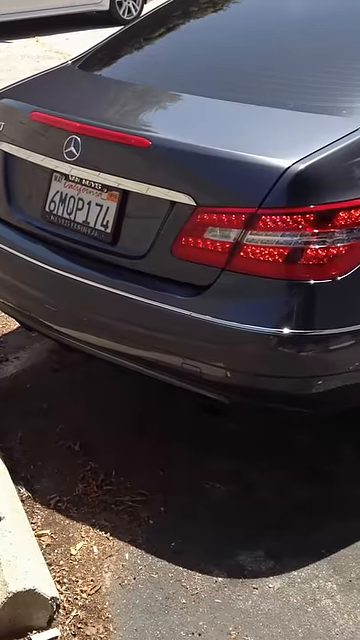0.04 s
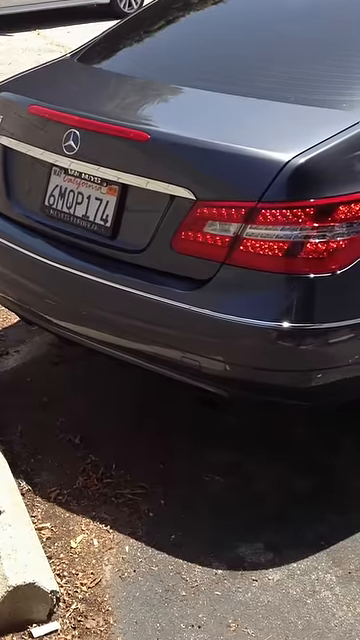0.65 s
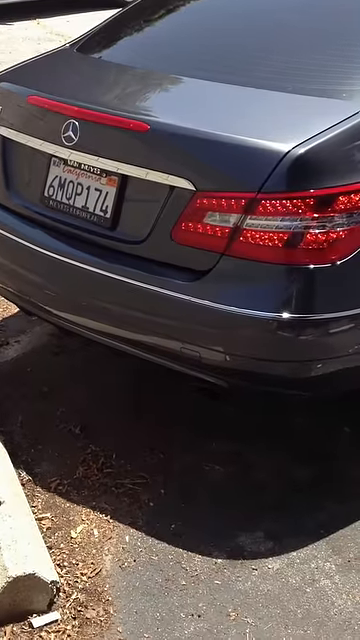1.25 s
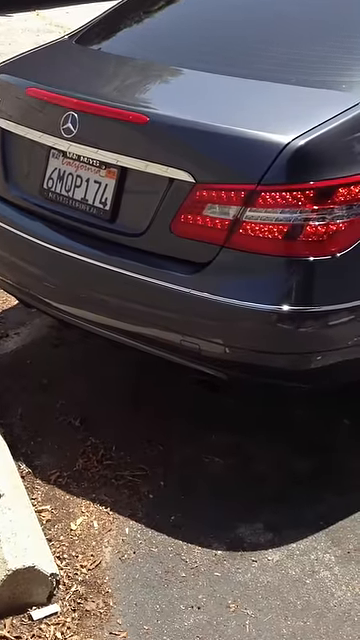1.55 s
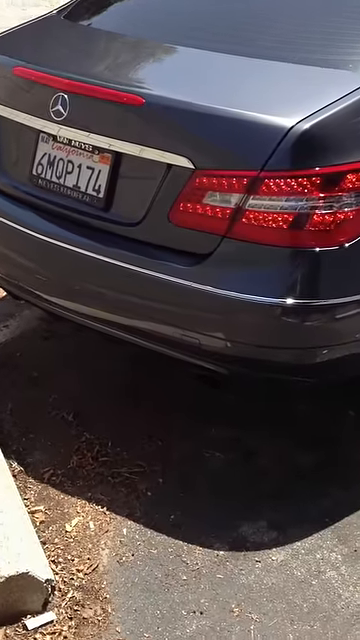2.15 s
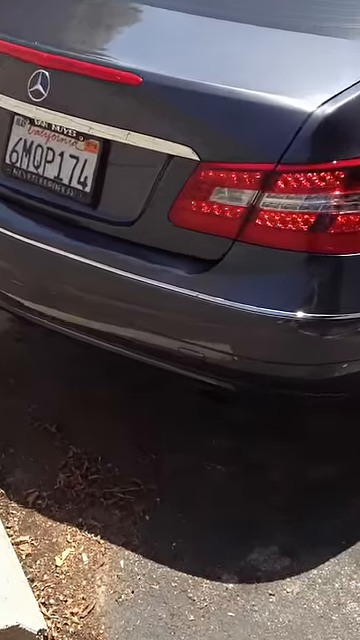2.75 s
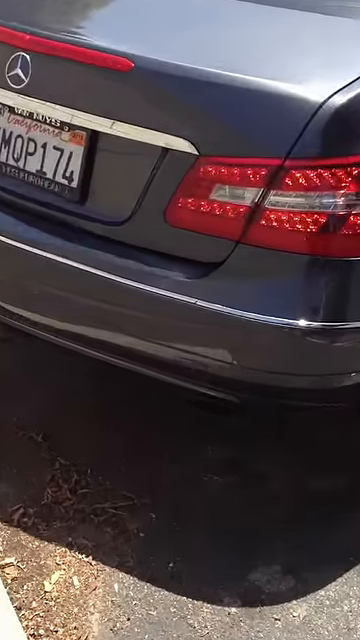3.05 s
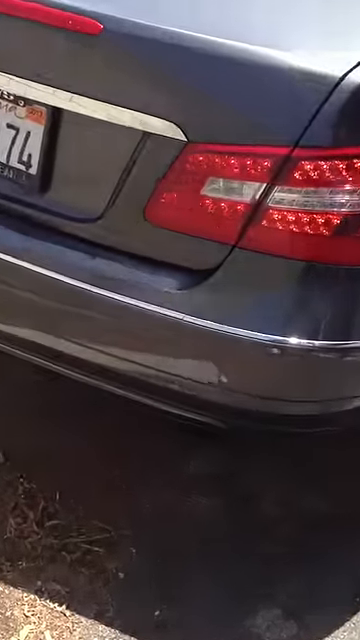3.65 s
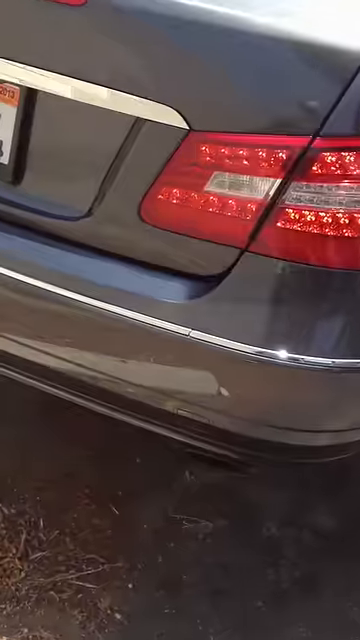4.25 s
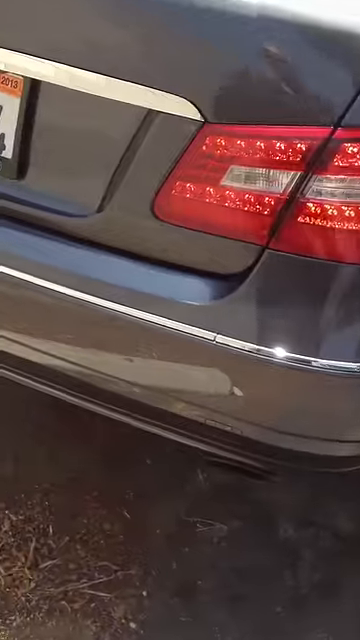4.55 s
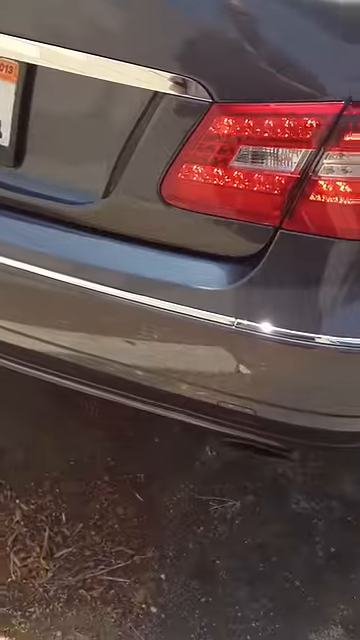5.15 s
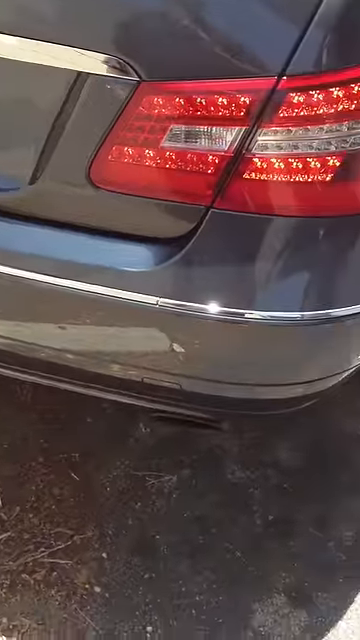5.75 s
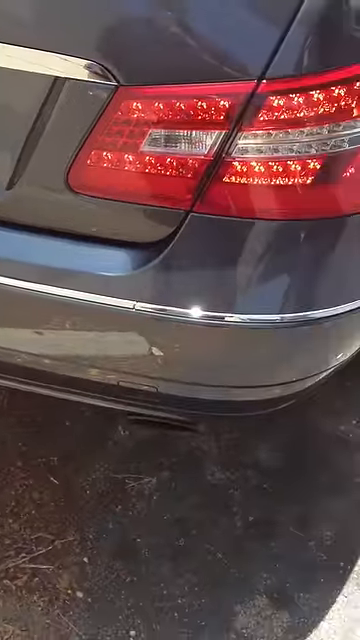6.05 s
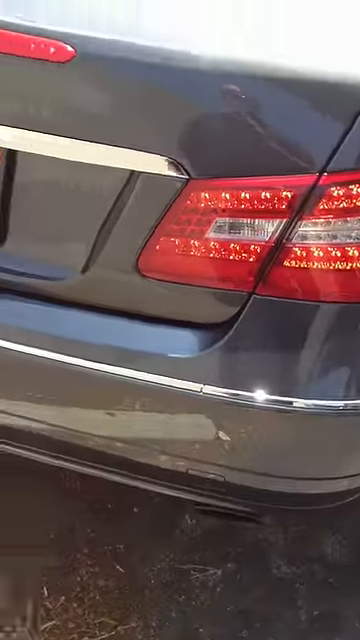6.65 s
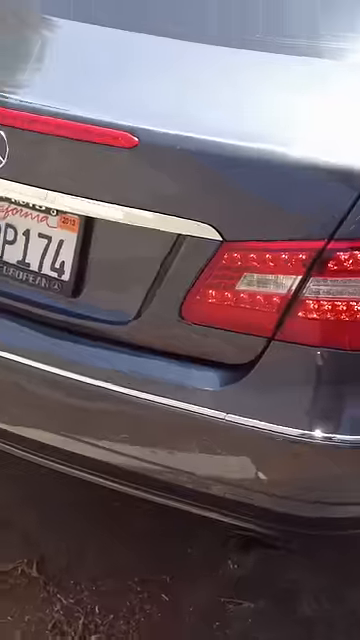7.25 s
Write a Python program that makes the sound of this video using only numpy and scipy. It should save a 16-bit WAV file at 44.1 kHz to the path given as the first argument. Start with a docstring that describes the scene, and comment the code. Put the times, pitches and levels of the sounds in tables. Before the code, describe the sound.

Close behind a parked car in quiet open air, a loud exhaust swells from a deep idle to a growling peak, spits a few quick cracks and sinks again. The microphone moves nearer the pipe as a second, higher rev builds and crackles. The engine note hangs for a moment, puffing and burbling over a breathy hiss, then drops back to a low rumble.

```python
"""Two revs through a sport exhaust

A parked six-cylinder car is revved twice, heard from just behind the tailpipe. The firing orders boom
as they sweep through the pipe's resonance. Under throttle the pipe barks, rasps and growls, at the top
of each rev it crackles, and on the way down it burbles and puffs over the hiss of the gas."""
import sys
import numpy as np
from scipy import signal
from scipy.fft import rfft, irfft, next_fast_len
from scipy.io import wavfile
from scipy.ndimage import uniform_filter1d, minimum_filter1d, map_coordinates

SR = 44100
rng = np.random.default_rng(int(sys.argv[2]) if len(sys.argv) > 2 else 0)


def dump_mix(stems):
    """Bounce the given channels to the path in sys.argv[1] as a 16-bit WAV at rate SR."""
    frames = np.atleast_2d(stems).T  # one column per channel
    limited = np.clip(frames, -1, 1)  # hard clip at full scale
    pcm = np.round(limited * 32767).astype(np.int16)
    wavfile.write(sys.argv[1], SR, pcm)


N = 331191
TIME = np.arange(N) / SR

# the six cylinders in firing order: pulse_size, lateness_periods
CYLINDERS = [(1.18, 0), (.85, .1), (1.12, 0), (.8, .11), (1.15, .012), (.88, .095)]
# harmonics of the firing rate: multiple, level_db, full_effort_db, speed_db_per_octave
ORDERS = [(1, 0.25, 11, -1), (2, -10, 21.5, -1), (3, -18, 29, -1.5), (4, -21, 29, -1.5)]
# the listener leans in as the second rev dies, lifting bark, rasp and hiss: time_s, gain_db
LEAN_IN = [(4.2, -.5), (5.1, -1.5), (5.8, 2.5), (6.3, 0.5), (7.0, -2)]


def boom(turns, speed, effort, near, waver_db=.6, roughness=.05):
    """The low firing orders carry the engine's note; the higher ones waver more."""
    tones = np.zeros(N)
    for k, order in enumerate(ORDERS, 1):
        gain = amp(order_db(order, speed, effort, near) + waver_db * k * wobble(14))
        tremble = 1 + roughness * k * wobble(45)
        tones += gain * tremble * firing_order(turns, k)
    return amp(lull_db()) * tones


def firing_order(turns, k):
    """A tone at k times the firing rate, its phase offset so the summed boom swings evenly."""
    return np.cos(2 * np.pi * k * turns - np.pi * k * (k - 1) / 4)


def order_db(order, speed, effort, near, build_up_s=.008):
    """An order fills out at the first touch of the pedal and swells through each pipe resonance."""
    k, base_db, effort_db, octave_db = order
    hz = round(k) * np.interp(TIME - build_up_s, TIME, speed)
    return pipe_db(hz, near) + layer_db((base_db, effort_db, 0, octave_db), speed, np.sqrt(effort), near)


def pipe_db(hz, near):
    """The pipe's low resonances, as heard from where the listener stands."""
    # pipe response: frequency_hz, aside_db, at_mouth_db
    response = [(44.7, -63, -61.9), (88.4, -39, -34.5), (107.6, -21.5, -16), (118.5, -18.5, -12.5),
                (138.4, -8.5, -6.5), (156.6, -11.5, -14.0), (185, -17.5, -28.5), (216, -20.5, -24.5),
                (238, -22, -11.5), (267, -37.5, -15.5), (307, -38.5, -20), (335, -28, -13.5),
                (400, -38.5, -38.5), (472, -33, -16), (550.0, -31.5, -25.5), (709, -29, -7),
                (794, -26, -38), (1000.0, -53, -16.5)]
    f, aside, mouth = np.transpose(response)
    return (1 - near) * along(np.c_[f, aside], hz) + near * along(np.c_[f, mouth], hz)


def lull_db(onset_s=.03):
    """The coasting engine's note briefly drops away, or once lifts, then recovers."""
    # lulls in the note: start_s, gain_db, recovery_s
    lulls = [(1.4, -5, 0.022), (2.79, -21.5, 0.27), (4.645, -3, 0.034), (5.42, -12, 0.02), (5.73, 3, 0.098),
             (6.93, -25, 0.26)]
    return sum(db * ramp_and_fall(s, onset_s, s + onset_s, recovery) for s, db, recovery in lulls)


def lope(turns, speed, effort, near, level_db=-13.5, waver_db=2):
    """Uneven cylinders burble between the orders, more at speed, under load and in the resonances."""
    # tones of the engine cycle: multiple, level_db
    cycle_tones = [(3, -11), (4, -3.5), (5, -2.5), (7, 0), (8, 0), (9, -8), (10, -3), (11, -1), (13, 0),
                   (14, -27), (15, -10), (16, -3), (17, -2)]
    upper_db = -4 + 6 * effort + 2 * near
    tones = np.zeros(N)
    for k, db in cycle_tones:
        ratio = round(k) / len(CYLINDERS)
        gain = amp(db + pipe_db(speed * ratio, near) + waver_db * wobble(10) + upper_db * (ratio > 1))
        tones += gain * np.sin(2 * np.pi * (ratio * turns + rng.random()))
    return amp(level_db) * np.minimum(speed / 160, 1) ** 1.04 * tones


def tailpipe(turns, speed, effort, near, flutter_db=1.5):
    """Firing pulses and gushes of gas excite the pipe's upper resonances: bark, rasp and growl."""
    # how each follows the engine: coasting_db, full_effort_db, near_db, speed_db_per_octave
    bark_law = (-41.5, 28.5, 5, 7.5)
    rasp_law = (-39.5, 15.5, 3.5, 7)
    growl_law = (-53, 34.5, 12, 1.5)
    bark_db, rasp_db, growl_db = (layer_db(law, speed, effort, near)
                                  for law in (bark_law, rasp_law, growl_law))
    # hard throttle brings out the pulses; a coasting engine fires unevenly and blows more noise
    drive = np.clip((bark_db + 36) / 18, .2, 1)
    pulses, gush = firings(turns)
    pulses *= amp(5.5 * (1 - drive) * wobble(140))
    tone, breath = pipe_echo(pulses), pipe_echo(gush * noise())
    body = amp(bark_db) * bark(tone, breath, drive, near)
    edge = amp(rasp_db) * rasp(tone, breath, drive, near)
    flutter = amp(flutter_db * effort * wobble(65))  # ragged under load
    return amp(curves(LEAN_IN)[0]) * flutter * (body + edge) + amp(growl_db) * growl(tone, breath)


def firings(turns, scatter_db=1.2, jitter_periods=.005):
    """One impulse per firing, and the envelope of the gush of gas that follows each."""
    samples = np.arange(N)
    number = np.arange(1, int(turns[-1]))
    size, late = np.array(CYLINDERS)[number % len(CYLINDERS)].T
    timing, strength = rng.standard_normal((len(number), 2)).T
    at = np.interp(number + late + jitter_periods * timing, turns, samples)
    pulses = np.bincount(np.round(at).astype(int), size * amp(scatter_db * strength), N)[:N]
    latest = np.clip(np.searchsorted(at, samples) - 1, 0, None)
    age_periods = np.abs(turns - np.interp(at, samples, turns)[latest])
    return pulses, unit(.52 + np.exp(-age_periods / .79))


def pipe_echo(x, round_trip_s=.0045, reflection=.091, smear_s=.008, width_hz=12):
    """The open end reflects, standing waves ring, and the muffler's chambers smear each pulse."""
    # narrow standing waves: pitch_hz, level_db
    modes = [(460, -3), (669, -6), (892, -2), (1003, -4), (1145, -4), (1263, -2), (1489, -1), (1888, -5),
             (2175, -2), (2347, -1), (2555, 0), (3128, 0)]

    def response(f):
        echo = 1 / (1 - reflection * np.exp(-2j * np.pi * f * round_trip_s))
        delay_s = smear_s * f / (f + 1500)
        smear = np.exp(-2j * np.pi * np.cumsum(delay_s) * f[1])
        damping = 1j * f * width_hz
        ring = 1 + sum(amp(db) * damping / (hz ** 2 - f ** 2 + damping) for hz, db in modes)
        return echo * smear * ring
    return filtered(x, response)


def pipe_voice(tone, breath, colour, drive, breathiness):
    """Pulses and breath through one colour of the pipe, held at an even level."""
    pitched = drive * steady(coloured(tone, colour))
    return steady(pitched + breathiness * unit(coloured(breath, colour)))


def bark(tone, breath, drive, near):
    """The pipe's midrange shout changes colour as the listener comes round to its mouth."""
    # colours at the mouth and off axis: frequency_hz, gain_db
    mouth_colour = [(150, -55), (300, -9), (430, -4), (540, -4), (670, 9.5), (820, 3), (1020, -1.5),
                    (1200, 3.5), (1330, -3), (1480, 3), (1700, -8), (2600, -15), (5000, -50)]
    aside_colour = [(150, -46), (320, -19), (450, 2), (540, -3), (660, 6.5), (800, 10), (1000, 7.5),
                    (1180, 5), (1350, -9.5), (1500, -8), (1750, -17), (2600, -31), (5000, -77)]
    mouth = pipe_voice(tone, breath, mouth_colour, drive, breathiness=.45)
    aside = pipe_voice(tone, breath, aside_colour, drive, breathiness=.55)
    return np.sqrt(near) * mouth + np.sqrt(1 - near) * aside


def rasp(tone, breath, drive, near, beam_db=2):
    """A bright edge beamed from the pipe's mouth; it turns to breath as the engine coasts."""
    # colours with the throttle open and shut: frequency_hz, gain_db
    open_colour = [(900, -34), (1550, -2), (1890, 4), (2200, -1), (2400, -2), (2800, -1.5), (3300, 0),
                   (4200, -9), (5500, -14), (9000, -28), (15000, -48)]
    shut_colour = [(900, -13), (1500, 5), (2000, 5), (2700, -3), (3400, -6.5), (4400, -4.5), (7000, -13.5),
                   (15000, -20)]
    driven = drive * pipe_voice(tone, breath, open_colour, drive, breathiness=.8)
    coasting = amp(-2) * np.sqrt(1 - drive ** 2) * unit(coloured(breath, shut_colour))
    return (driven + coasting) * amp(beam_db * (near - .5))


def growl(tone, breath):
    """Pulses and a little breath ring in the pipe's throaty low mids."""
    # throat colour: frequency_hz, gain_db
    throat = [(180, -48.5), (270, -17.5), (350, 3.5), (450, 1.5), (550, -15.5), (660, -3), (780, 5.5),
              (920, -20.5), (1400, -48.5)]
    return steady(coloured(tone, throat)) + .22 * unit(coloured(breath, throat))


def crackle(rise_s=.00017, fall_s=.0096, split_hz=5500):
    """Each crack is a sudden burst of turbulence; the hardest reach far into the treble."""
    # cracks at the top of a rev, one an engine cycle: start_s, level_db, treble_db
    cracks = [(1.2229, -5.5, -28), (1.246, -4.5, -25), (1.269, -3, -14), (1.2964, -9, -26),
              (4.532, -3, -25), (4.554, -3, -18.5), (4.576, -4, -12), (4.5976, -0.5, -15),
              (4.6223, -2, -16), (4.6458, -10, -20), (4.663, -11, -24)]
    # their colour: frequency_hz, gain_db
    colour = [(60, -52), (530, -35), (900, -10), (1100, -7), (1360, -30), (1510, -7), (1760, -14),
              (1910, -4), (3030, -13), (4570, -18), (6060, -20.5), (7150, -14), (9820, -29.5), (15000, -36)]
    body, edge = np.zeros(N), np.zeros(N)
    for s, db, treble_db in cracks:
        age = np.clip(TIME - s, 0, 1)
        burst = amp(db) * (1 - np.exp(-age / rise_s)) * np.exp(-age / fall_s)
        body += burst
        edge += burst * amp(treble_db)
    low = unit(filtered(coloured(noise(), colour), lambda f: f < split_hz))
    high = unit(filtered(coloured(noise(), colour), lambda f: f > split_hz))
    return amp(-7) * body * low + edge * high


def overrun(turns):
    """As the throttle shuts, afterburn puffs thump in the pipe and single orders honk."""
    # soft puffs: start_s, level_db, pitch_hz, rise_s
    puffs = [(4.69, -39, 137, 0.011), (4.91, -28, 140.1, .01), (5.155, -19.5, 134, 0.0146),
             (5.42, -21, 132, 0.02), (5.61, -21, 140, 0.015), (7.382, -18.5, 155, 0.01)]
    # brief honks: centre_s, firing_order, level_db, width_s
    honks = [(4.915, 1, -15, .008), (5.624, 3, -13, .007), (5.624, 4, -20, .008)]
    out = np.zeros(N)
    for s, db, hz, rise in puffs:
        age = np.clip(TIME - s, 0, 1)
        envelope = (age / rise * np.exp(1 - age / rise)) ** 2
        out += amp(db) * envelope * np.sin(2 * np.pi * hz * age)
    for s, k, db, width in honks:
        out += amp(db) * swell(s, width) * firing_order(turns, round(k))
    return out


def gas_flow(turns, speed, effort, near, hiss_lag_s=.15):
    """Outflow: a throbbing hiss, a low rush, pipe rumble, and buffeting under boom and hard throttle."""
    # how each follows the engine: coasting_db, full_effort_db, near_db, speed_db_per_octave
    hiss_law = (-45, 9, 2, 6.5)
    rush_law = (-39.5, 9.5, 7.5, 4.5)
    # their colours: frequency_hz, gain_db
    hiss_colour = [(900, -29), (2500, 4), (4300, -1.5), (5500, -4), (7300, 2), (8500, -2), (10000, -7.5),
                   (12500, -8), (15500, -18)]
    rush_colour = [(25, -28), (60, -25), (100, -7), (140, -2), (250, 15), (350, 0.5), (560, 3.5), (850, -7),
                   (1400, 0), (3000, -41)]
    boom_db = order_db(ORDERS[0], speed, effort, near)
    buffet = (amp(2 * boom_db - 39) + amp(-41) * effort ** 2) * band(86, 70)
    rumble = amp(boom_db - 25) * unit(filtered(band(160, 93), lambda hz: amp(pipe_db(hz, near=1))))
    trailing_speed = np.interp(TIME - hiss_lag_s, TIME, speed)
    hiss_db = layer_db(hiss_law, trailing_speed, np.sqrt(effort), near) + curves(LEAN_IN)[0]
    throb = 1 + .068 * np.cos(2 * np.pi * turns)
    hiss = amp(hiss_db) * throb * unit(coloured(noise(), hiss_colour))
    rush = amp(layer_db(rush_law, speed, effort, near)) * unit(coloured(noise(), rush_colour))
    return hiss + rush + rumble + buffet


def whistle():
    """A thin, wavering whistle sinks after the second rev peaks."""
    # its glide: time_s, pitch_hz, level_db
    glide = [(4.75, 11600, -62), (4.85, 10900, -52), (5.0, 9700, -53), (5.1, 9000, -50), (5.25, 8500, -64)]
    hz, db = curves(glide)
    sounding = (TIME > glide[0][0]) & (TIME < glide[-1][0])
    return sounding * amp(db) * np.sin(2 * np.pi * np.cumsum(hz + 25 * wobble(150)) / SR)


def ticks_and_chirps(tick_s=.0014):
    """Two small ticks and a few faint high chirps, each a swell of band noise."""
    # ticks: start_s, level_db, pitch_hz, width_hz
    ticks = [(2.686, -32.5, 4370, 6000), (3.1, -22.5, 1390, 450)]
    # chirps: centre_s, level_db, pitch_hz, width_s, width_hz
    chirps = [(3.286, -58, 6130, 0.049, 454), (3.452, -57, 4453, 0.029, 451.5),
              (3.55, -61.5, 6160, 0.045, 453), (4.74, -53, 3150, 0.036, 90),
              (5.03, -38, 3150, 0.066, 79.96), (5.099, -43, 8900, 0.06, 89.8), (5.5, -51, 8916, 0.055, 90),
              (7.392, -56, 6250, .03, 448.8)]
    ticking = sum(amp(db) * swell(s + tick_s, tick_s) * band(hz, width) for s, db, hz, width in ticks)
    return ticking + sum(amp(db) * swell(s, span) * band(hz, width) for s, db, hz, span, width in chirps)


def idle_drone():
    """A hollow drone comes up as the engine settles."""
    # its resonances: pitch_hz, width_hz, level_db
    modes = [(268, 45, 0), (535, 65, -7), (770, 50, -10)]
    # its fade-in: time_s, level_db
    fade = [(0, -111), (6.5, -57), (6.85, -39.5), (7.2, -34), (7.51, -30)]
    return amp(curves(fade)[0]) * unit(sum(amp(db) * band(hz, width) for hz, width, db in modes))


def outdoor_air(level_db=-47):
    """A quiet, steady bed of open air."""
    # its colour: frequency_hz, gain_db
    colour = [(30, -68), (120, -18), (430, 7.5), (600, -13), (1100, 2), (2000, -13.5), (5000, -16),
              (12000, -75)]
    return amp(level_db) * unit(coloured(noise(), colour))


def layer_db(law, speed, effort, near, mid_speed_hz=150):
    """A layer's level follows effort, nearness and engine speed."""
    base_db, effort_db, near_db, octave_db = law
    return base_db + effort_db * effort + near_db * near + octave_db * np.log2(speed / mid_speed_hz)


def ramp_and_fall(start_s, rise_s, release_s, fall_s):
    """An envelope that ramps up, holds and dies away."""
    return np.clip((TIME - start_s) / rise_s, 0, 1) * np.exp(-np.maximum(TIME - release_s, 0) / fall_s)


def swell(centre_s, width_s):
    """A bell-shaped envelope."""
    return np.exp(-np.minimum(((TIME - centre_s) / width_s) ** 2, 100) / 2)


def amp(db):
    """Decibels to gain."""
    return 10 ** (np.asarray(db) / 20)


def unit(x):
    """Scale to rms 1."""
    return x / np.sqrt(np.mean(x ** 2) + 1e-20)


def steady(x):
    """Hold the running rms at 1."""
    return x / np.sqrt(np.abs(uniform_filter1d(x ** 2, size=2600)) + 1e-12)


def along(points, hz):
    """Read (frequency_hz, value) points on a log axis."""
    f, v = np.transpose(points)
    return np.interp(np.log(hz + 1), np.log(f + 1), v)


def curves(rows):
    """One value per sample for each column after the time."""
    s, *cols = np.transpose(rows)
    return [np.interp(TIME, s, c) for c in cols]


def wobble(rate):
    """A smooth random curve, rate knots a second."""
    return map_coordinates(rng.standard_normal(int(N * rate / SR) + 4), [TIME * rate])


def filtered(x, response):
    """Shape x by a function of frequency."""
    m = next_fast_len(N + 8192)
    return irfft(rfft(x, m) * response(np.fft.rfftfreq(m, 1 / SR)), m)[:N]


def coloured(x, colour, size=4096):
    """A minimum-phase filter through (frequency_hz, gain_db) points."""
    cepstrum = irfft(np.log(amp(along(colour, np.fft.rfftfreq(size, 1 / SR)))))
    cepstrum[1:size // 2] *= 2
    cepstrum[size // 2 + 1:] = 0
    return signal.oaconvolve(x, irfft(np.exp(rfft(cepstrum))))[:N]


def noise():
    """White noise of rms 1."""
    return rng.standard_normal(N)


def band(hz, width_hz):
    """Noise of rms 1 in one resonance."""
    return unit(filtered(noise(), lambda f: 1 / (1 + ((f - hz) / width_hz) ** 2) ** 2))


def scene():
    """Engine speed, throttle and the listener's nearness drive the exhaust, over a faint background."""
    # engine speed: time_s, firing_rate_hz
    revs = [(0.0, 53.0), (0.12, 51.2), (0.3, 66.5), (0.5, 97.8), (0.66, 111.9), (0.88, 174.9),
            (1.07, 178.4), (1.3, 251.0), (1.5, 215.1), (2.2, 130.5), (2.5, 94.2), (2.78, 64.5), (3.1, 46.4),
            (3.52, 41.0), (3.75, 55.1), (3.95, 82.7), (4.2, 130.0), (4.33, 170.0), (4.6, 269.7),
            (4.68, 293.4), (4.92, 254.9), (5.16, 250.0), (5.44, 213.5), (5.62, 225.2), (5.8, 198.1),
            (6.5, 114.4), (6.75, 82.7), (7.0, 60.2), (7.25, 46.8), (7.51, 41.6)]
    # presses of the accelerator: down_s, up_s, effort_0_to_1, rise_s, fall_s
    presses = [(.128, .658, 0.3, .243, .03), (.61, 0.801, 0.68, 0.047, 0.09),
               (1.061, 1.221, 0.94, .115, 0.033), (1.18, 1.294, 0.71, .05, 0.023),
               (3.542, 4.06, 0.38, 0.52, 0.033), (4.02, 4.131, 0.61, .085, 0.095),
               (4.17, 4.294, 0.56, .09, 0.055), (4.24, 4.52, 0.77, .2, 0.046),
               (4.45, 4.66, 0.35, .05, 0.011), (4.7, 4.943, 0.07, .05, 0.0033),
               (5.016, 5.287, 0.2, .25, 0.063), (5.458, 5.629, 0.27, .27, 0.028)]
    # the listener steps toward the pipe's mouth: time_s, nearness_0_to_1
    approach = [(2.7, 0), (4.2, 0.88), (5.2, 0.89), (5.8, 1), (6.4, 0.8), (7.5, .7)]
    speed, = curves(revs)
    near, = curves(approach)
    effort = np.max([depth * ramp_and_fall(down, rise, up, fall)
                     for down, up, depth, rise, fall in presses], axis=0)
    turns = np.cumsum(speed) / SR  # one turn of phase per firing
    state = turns, speed, effort, near
    exhaust = boom(*state) + lope(*state) + tailpipe(*state) + gas_flow(*state)
    exhaust += crackle() + overrun(turns)
    return (exhaust + whistle() + ticks_and_chirps() + idle_drone() + outdoor_air())[None]


def record(dry, ceiling=.96, top_hz=15500):
    """A fast limiter holds down the peaks, then the top of the treble is cut off."""
    needed = np.minimum(1, ceiling / (np.abs(dry[0]) + 1e-9))
    gain = uniform_filter1d(minimum_filter1d(needed, size=400), size=300)
    return filtered(dry[0] * gain, lambda hz: hz < top_hz)[None]


dry = scene()
out = record(dry)
dump_mix(out)
```